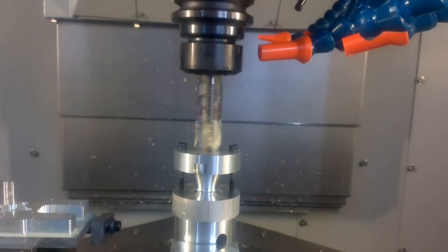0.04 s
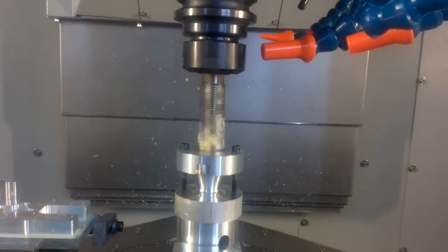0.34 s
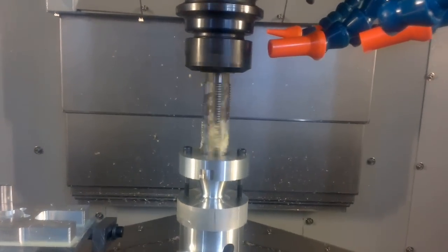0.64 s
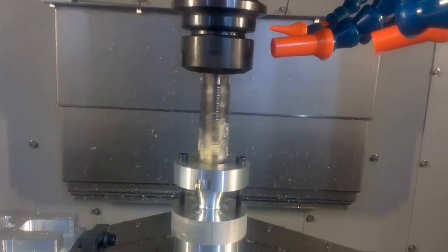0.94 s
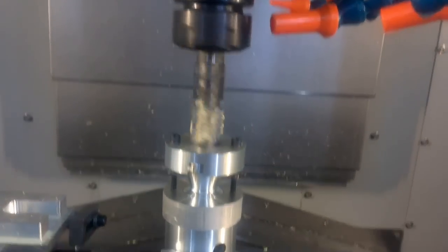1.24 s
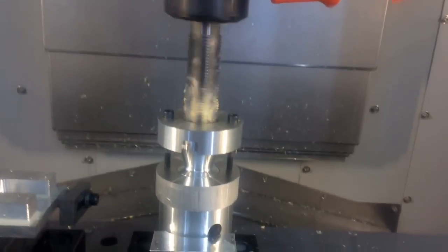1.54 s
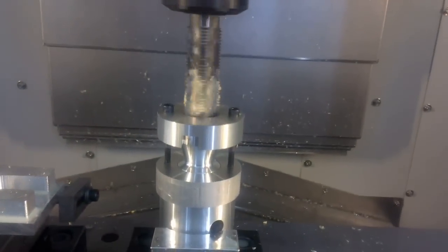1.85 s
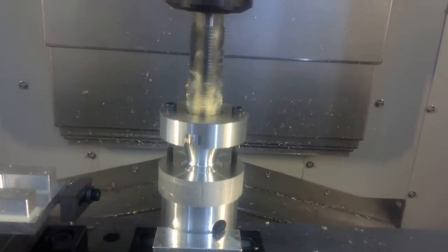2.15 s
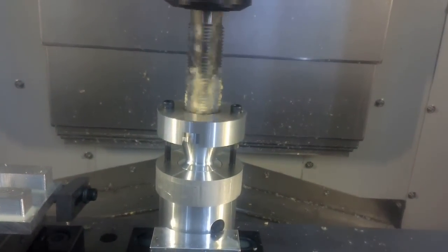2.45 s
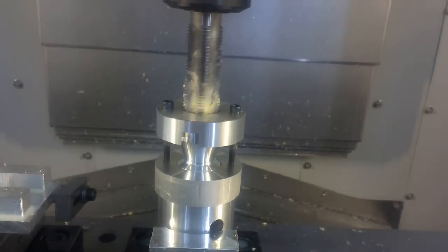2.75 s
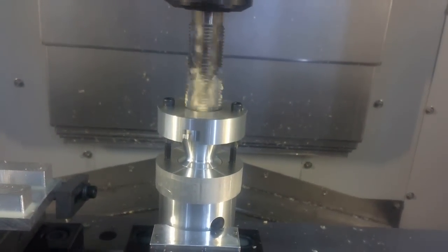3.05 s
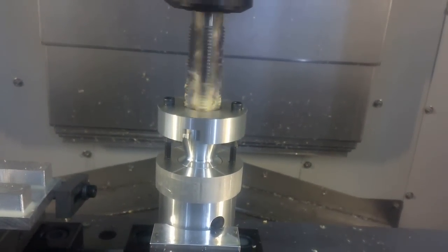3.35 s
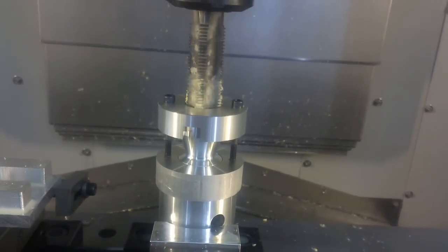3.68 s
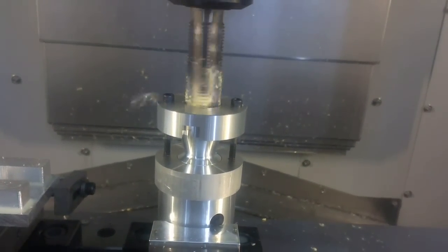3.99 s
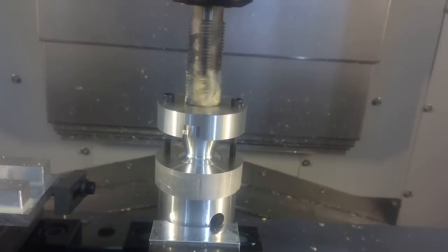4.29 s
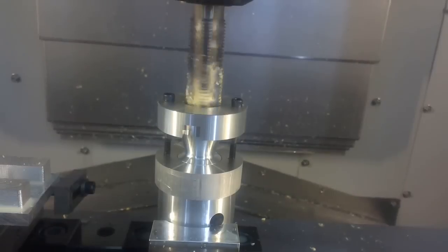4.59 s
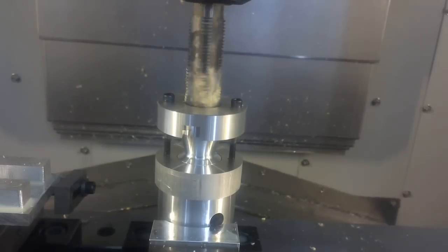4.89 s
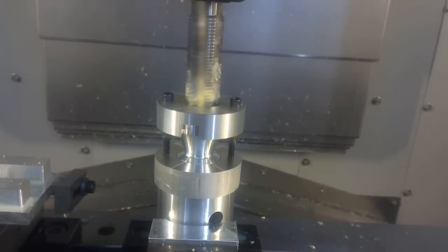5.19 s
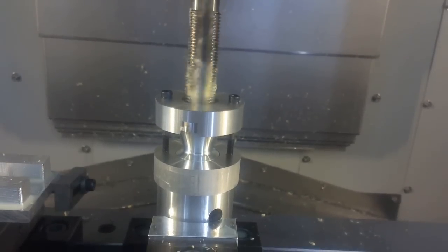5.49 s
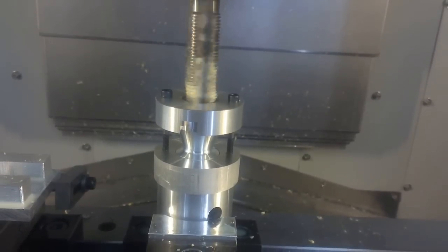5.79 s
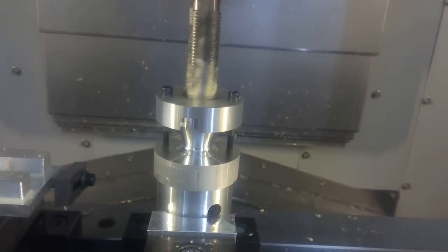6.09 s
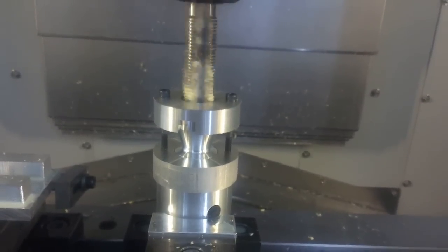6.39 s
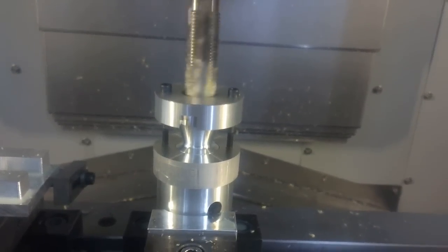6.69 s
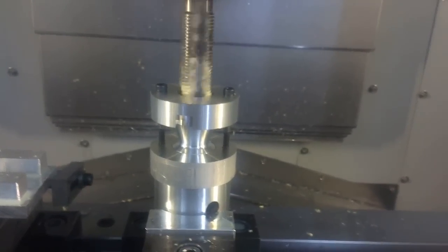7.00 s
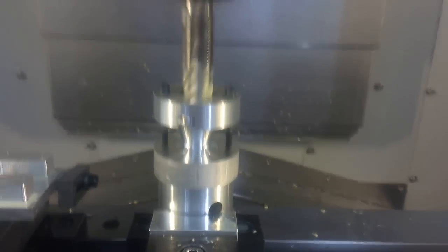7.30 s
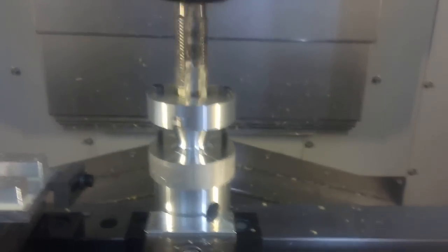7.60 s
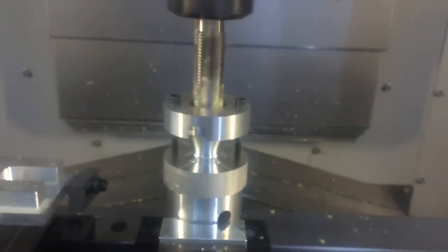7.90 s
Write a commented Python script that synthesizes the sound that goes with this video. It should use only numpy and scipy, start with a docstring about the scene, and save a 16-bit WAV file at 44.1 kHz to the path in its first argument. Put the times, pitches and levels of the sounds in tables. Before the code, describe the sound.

A loud, high, slightly hollow air hiss runs for the whole eight seconds inside the steel enclosure of a machining centre. It flutters very slightly as a tool turns slowly. Beneath it lies the machine's quiet rush, with faintly ringing panels and a barely audible rumble. Four short, soft knocks sound close to the microphone at about 0.4, 0.9, 1.5 and 1.7 seconds. The second is lightest and the last is a heavier thud; each echoes briefly off the walls. As the microphone moves, the hiss grows a little louder and fuller around 1 to 1.5 seconds, holds steady, then turns slightly louder and sharper from about 6.3 seconds, peaking near 6.8. The rush swells briefly at 6.6 seconds. A faint, rough, wavering hum comes and goes around 1.5, 4.2 and 6 seconds.

```python
"""An air jet hisses steadily inside the steel enclosure of a machining centre.
A slowly turning tool flutters the hiss each turn; its colour changes as the microphone moves.
The machine's rush rings the panels faintly over a very faint rumble, and a hum comes and goes.
Four soft knocks close to the microphone echo off the walls; a limiter flattens the brief overloads."""
import sys
import numpy as np
from scipy import signal
from scipy.fft import rfft, irfft
from scipy.io import wavfile

SR = 44100
rng = np.random.default_rng(int(sys.argv[2]) if len(sys.argv) > 2 else 0)


def persist_wave(psi):
    """Save psi, clipped to +-1, as 16-bit WAV."""
    counts = np.round(np.clip(psi, -1, 1) * 32767).astype(np.int16)
    wavfile.write(sys.argv[1], SR, np.atleast_2d(counts).T)


N = 358974
T = np.arange(N) / SR
HZ = np.fft.rfftfreq(N, 1 / SR)


def amp(db):
    """Decibels to gain."""
    return 10 ** (np.asarray(db) / 20)


def unit(x):
    """Scale to rms 1."""
    return x / np.sqrt(np.mean(x ** 2) + 1e-20)


def colour(points):
    """dB spectrum through (Hz, dB) points, log-frequency axis."""
    hz, db = np.transpose(points)
    return np.interp(np.log(HZ + 1), np.log(hz + 1), db)


def resonances(modes):
    """dB spectrum of summed resonance peaks and dips."""
    return sum(db / (1 + (2 * (HZ - hz) / width_hz) ** 2) for hz, width_hz, db in modes)


def shaped(x, db):
    """Filter by a dB spectrum; rms 1."""
    return unit(irfft(rfft(x) * amp(db), N))


def wander(rate_hz):
    """Low-passed noise, rms 1."""
    return shaped(rng.standard_normal(N), -10 * np.log10(1 + (HZ / rate_hz) ** 4))


def low_cut(x, hz):
    """Steep microphone bass cut; rings briefly at its edge."""
    return signal.sosfilt(signal.cheby1(5, .7, hz, "high", fs=SR, output="sos"), x)


def enclosure(x, t60_s, delay_s, build_s=1 / SR):
    """Dense steel-wall reflections, building up after a delay."""
    t = T[:SR // 2]
    onset = np.clip((t - delay_s) / build_s, 0, 1)
    tail = rng.standard_normal(len(t)) * amp(-60 * t / t60_s) * onset
    return signal.fftconvolve(x, tail / np.linalg.norm(tail))[:N]


def turbulence(ripple_db=-16):
    """Noise with the fine ripple of standing waves between the walls."""
    air = rng.standard_normal(N)
    return air + amp(ripple_db) * enclosure(air, t60_s=.15, delay_s=.002)


# Broad resonances that hollow the hiss (frequency [Hz], width [Hz], gain [dB])
JET_MODES = [(3760, 100, 4), (4390, 140, -2.5), (4560, 100, 1.5), (4990, 114, 4), (5060, 140, -3.5),
             (5395, 79, 4.5), (6330, 250, 2), (6960, 200, -1), (7370, 160, 0.5), (7800, 90, 1),
             (8100, 170, -3), (9140, 250, 2), (9600, 250, -2), (9850, 130, 2), (10480, 300, -3),
             (11050, 220, 6.5)]
# Jet spectrum from further back (frequency [Hz], relative level [dB])
BACK_SPECTRUM = [(1760, -49), (3000, -22.5), (3440, -25), (4260, -9), (4850, -17), (5300, -7), (6640, 0),
                 (7350, -12), (7890, -8.5), (8420, -15), (9310, -14.5), (10900, -30), (12400, -54),
                 (16100, -77), (22000, -120)]
# Jet spectrum from close by (frequency [Hz], relative level [dB])
CLOSE_SPECTRUM = [(1760, -60), (3000, -24.5), (4040, -12), (4790, -2.5), (5400, -5), (6150, 2.5), (6720, 1),
                  (7300, 3.5), (7610, 0.5), (8370, -9), (9370, -13.5), (10100, -12), (10700, -24.5),
                  (11400, -32.5), (12400, -49), (16100, -84), (22000, -120)]
# Jet spectrum from one side (frequency [Hz], relative level [dB])
SIDE_SPECTRUM = [(1760, -69), (3000, -44.5), (3280, -30), (3610, -25), (3850, -16), (4280, -46),
                 (4440, -22), (4790, -3.5), (6150, 9), (6800, -4.5), (7570, -8), (8270, -3), (9940, -16),
                 (11400, -29), (12400, -46), (16100, -78), (22000, -120)]
# Microphone path (time [s], place [0 back, 1 close, 2 side])
MIC_PATH = [(0, .46), (.8, 0.49), (1.35, 0.94), (2.1, 1.01), (6.2, 1.05), (6.4, 1.35), (6.75, 1.52),
            (7.15, 1.34), (8.14, 1.37)]


def jet(close_db=-16.5, db_per_place=4, spindle_hz=6.67, turn_db=.21, half_turn_db=.08, eddy_db=.92):
    """Turbulent hiss; colour and level follow the microphone, the tool stirs it once and twice a turn."""
    spectrum = rfft(turbulence()) * amp(resonances(JET_MODES))
    centres_hz, spacing_hz = np.linspace(0, 16000, 13, retstep=True)
    air = np.zeros(N)
    for hz in centres_hz:  # eddies flicker each band independently
        band = irfft(spectrum * np.maximum(1 - abs(HZ - hz) / spacing_hz, 0), N)
        air += band * amp(eddy_db * wander(14))
    place = np.interp(T, *np.transpose(MIC_PATH))
    hiss = np.zeros(N)
    for k, view in enumerate([BACK_SPECTRUM, CLOSE_SPECTRUM, SIDE_SPECTRUM]):
        weight = np.maximum(1 - abs(place - k), 0)
        hiss += weight * shaped(air, colour(view))
    angle = 2 * np.pi * spindle_hz * (T - .048)
    tool_db = turn_db * np.cos(angle) + half_turn_db * np.cos(2 * angle)
    drift_db = .2 * wander(3)
    flutter_db = .45 * wander(70)
    return hiss * amp(close_db + db_per_place * (place - 1) + tool_db + drift_db + flutter_db)


# Rush spectrum (frequency [Hz], relative level [dB])
RUSH_SPECTRUM = [(250, -1.5), (330, 0), (390, 1), (460, -1), (580, -4.5), (760, -5), (900, -1.5),
                 (1400, -1.5), (1800, -0.5), (2300, 0.5), (2900, -1.5), (3400, -4), (4300, -4.5),
                 (7000, -74)]
# Enclosure panel resonances (frequency [Hz], width [Hz], gain [dB])
PANEL_MODES = [(393, 11.6, 9.5), (503, 34, 6.5), (653, 23, 7.5), (842, 29, 5.5), (1004, 30, 4),
               (1316, 23, 4.5), (1425, 15, 2.5), (1684, 30, 3.5), (1788, 27, 7), (1922, 49, 7),
               (2132, 13, 10), (2173, 12, 12), (2275, 19, 6.5), (2315, 17, 7.5), (2390, 18, 9.5),
               (2670, 74, 7.5), (3030, 16, 0), (3314, 20, 13)]
# Single swell of the rush (centre [s], half length [s], gain [dB])
SWELL = (6.6, 0.12, 3.3)


def rush(level_db=-39, drift_db=.25, flutter_db=.9):
    """Broad rush of the running machine, lifted at the panel resonances; swells once."""
    centre_s, half_s, peak_db = SWELL
    swell_db = peak_db * np.exp(-((T - centre_s) / half_s) ** 2)
    gain = amp(level_db + swell_db + drift_db * wander(2) + flutter_db * wander(25))
    return gain * shaped(turbulence(), colour(RUSH_SPECTRUM) + resonances(PANEL_MODES))


def rumble(level_db=-84, uneven_db=3, top_hz=300):
    """Very faint, uneven low noise."""
    return amp(level_db + uneven_db * wander(11)) * wander(top_hz)


# Knocks at the microphone, levels before filtering
# (time [s], push [dB], rise [s], polarity [+-1], thud [dB], low-pass [Hz])
KNOCK_HITS = [(.3548, 14.5, .0008, -1, -36, 1550), (.853, 7.5, .001, 1, -55, 2000),
              (1.4511, 18.5, .0016, 1, -38, 1850), (1.6513, -15, .0005, 1, 3.5, 4200)]


def knocks(ring_hz=358, thud_t60_s=.025, swing_gain=4, swing_s=.002):
    """Quick pressure pushes ring the bass cut; a heavy one adds a thud with a large first swing."""
    out = np.zeros(N)
    for start_s, push_db, rise_s, polarity, thud_db, top_hz in KNOCK_HITS:
        t = np.maximum(T - start_s, 0)
        push = polarity * t / rise_s * np.exp(1 - t / rise_s)
        first_swing = 1 + swing_gain * np.exp(-t / swing_s)
        thud = np.sin(2 * np.pi * ring_hz * t) * amp(-60 * t / thud_t60_s) * first_swing
        knock = amp(push_db) * low_cut(push, ring_hz) + amp(thud_db) * thud
        out += signal.sosfilt(signal.butter(10, top_hz, fs=SR, output="sos"), knock)
    return out


def knock_echo(gain_db=5.5, band_hz=(1250, 3300)):
    """The steel walls return the bright edge of each knock."""
    impulses = np.zeros(N)
    impulses[[round(start_s * SR) for start_s, *_ in KNOCK_HITS]] = 1
    edges = signal.sosfilt(signal.butter(4, band_hz, "band", fs=SR, output="sos"), impulses)
    return amp(gain_db) * enclosure(edges, t60_s=.15, delay_s=.006, build_s=.015)


# Swells of the hum (start [s], end [s], level [dB])
HUM_SWELLS = [(1.28, 1.635, -46.5), (4.05, 4.297, -48.5), (5.73, 6.16, -46)]


def hum(pitch_hz=428, waver=.0086, rough_db=4):
    """Rough, wavering tone that swells three times."""
    envelope = np.zeros(N)
    for start_s, end_s, level_db in HUM_SWELLS:
        progress = np.clip((T - start_s) / (end_s - start_s), 0, 1)
        envelope += amp(level_db) * np.sqrt(np.maximum(np.sin(np.pi * progress), 0))
    cycles = np.cumsum(pitch_hz * (1 + waver * wander(13.5))) / SR
    return envelope * unit(np.sin(2 * np.pi * cycles)) * amp(rough_db * wander(28))


def scene():
    """Mono sum at the microphone."""
    machine = low_cut(jet() + rush() + hum(), hz=338)
    return (machine + knocks() + knock_echo() + rumble())[None]


def record(dry, ceiling=.73, release_db_per_s=3500, top_hz=15700):
    """Fast peak limiter flattens knocks and ducks the hiss under them; low-pass follows."""
    over_db = 20 * np.log10(np.maximum(abs(dry[0]) / ceiling, 1))
    release_db = T * release_db_per_s
    reduction_db = np.maximum.accumulate(over_db + release_db) - release_db
    low_pass = signal.firwin(511, top_hz, window=("kaiser", 9), fs=SR)
    return signal.oaconvolve(dry / amp(reduction_db), low_pass[None], "same")


dry = scene()
out = record(dry)
persist_wave(out)
```